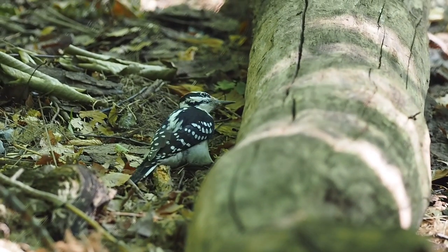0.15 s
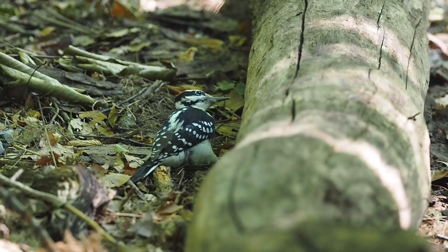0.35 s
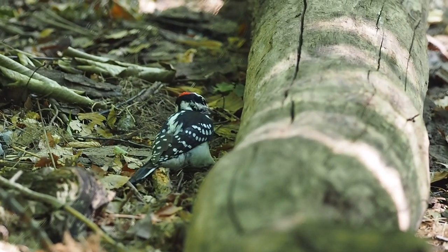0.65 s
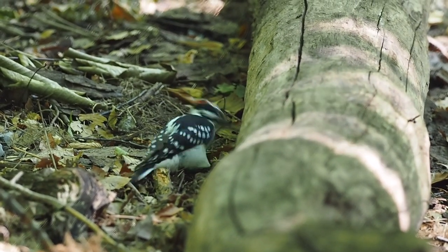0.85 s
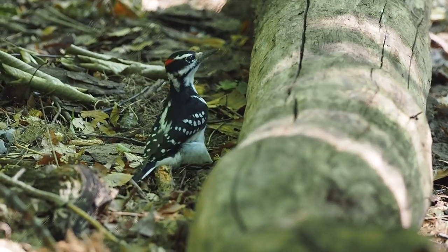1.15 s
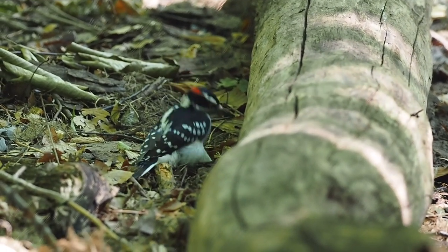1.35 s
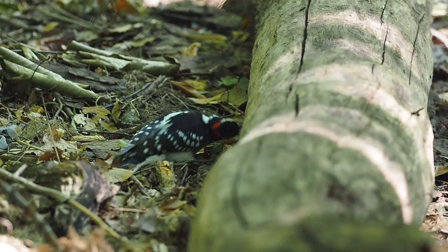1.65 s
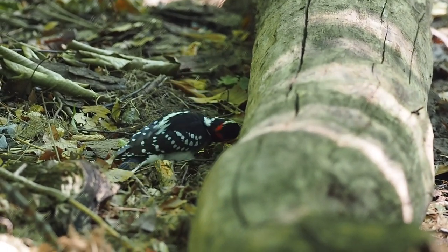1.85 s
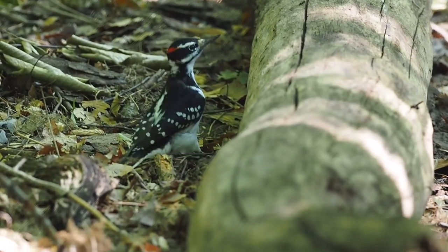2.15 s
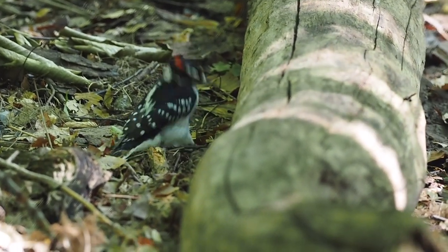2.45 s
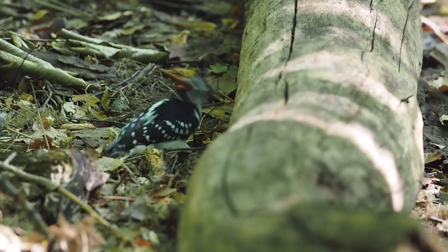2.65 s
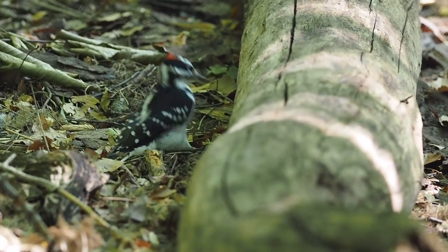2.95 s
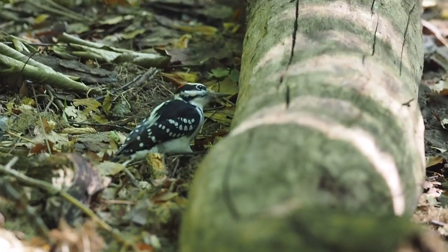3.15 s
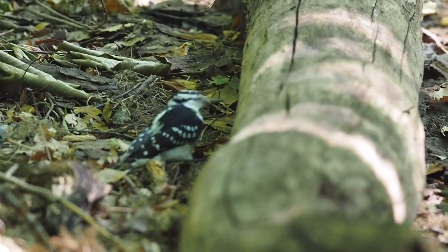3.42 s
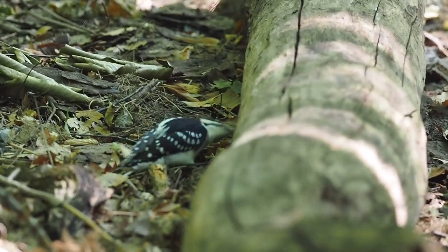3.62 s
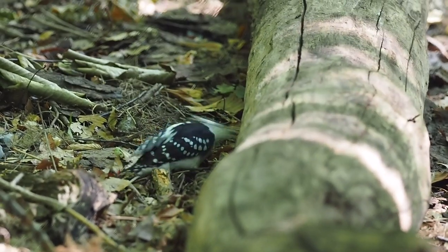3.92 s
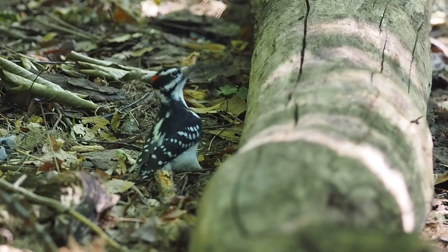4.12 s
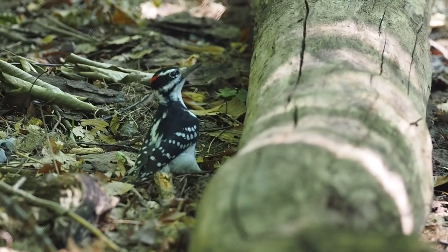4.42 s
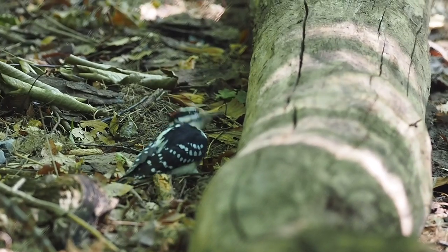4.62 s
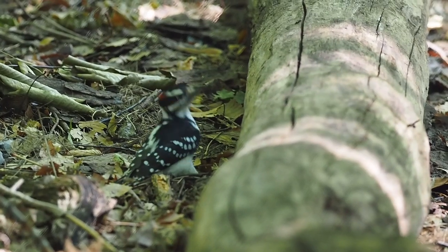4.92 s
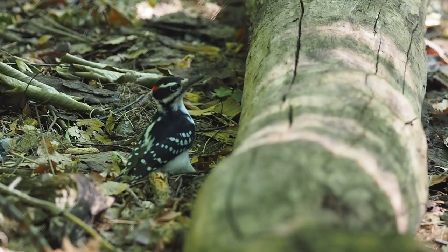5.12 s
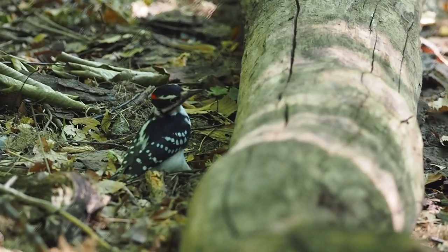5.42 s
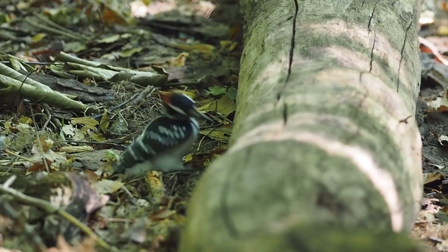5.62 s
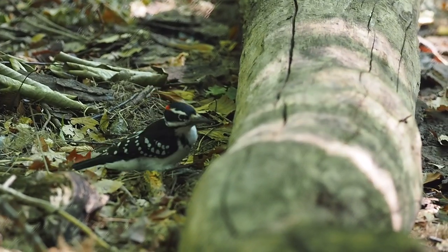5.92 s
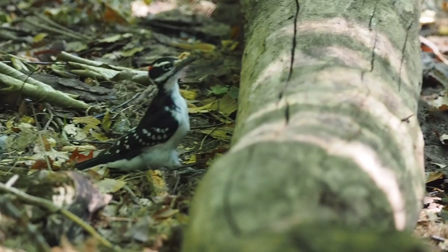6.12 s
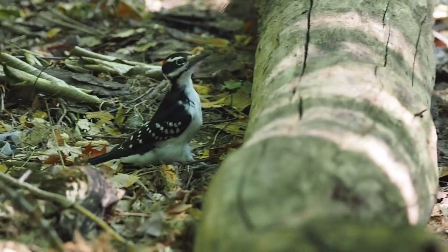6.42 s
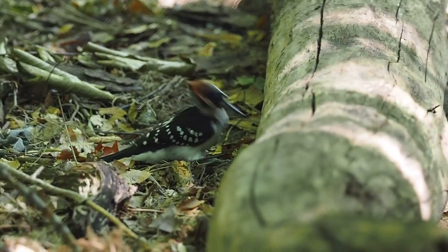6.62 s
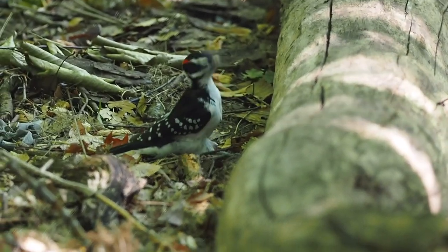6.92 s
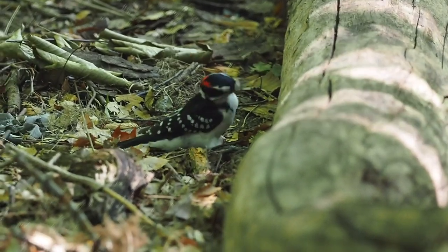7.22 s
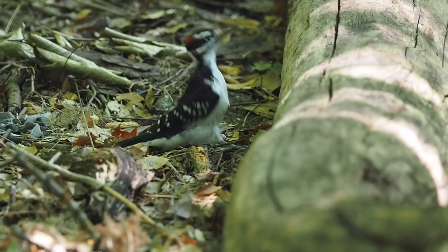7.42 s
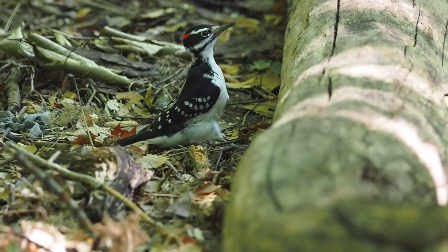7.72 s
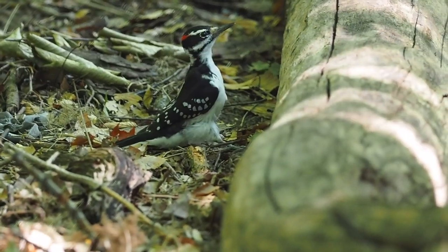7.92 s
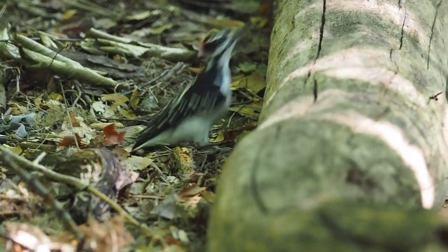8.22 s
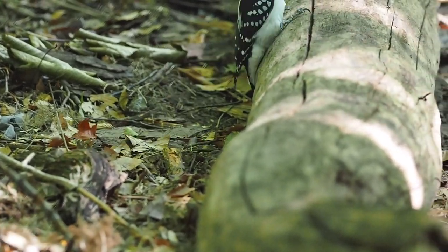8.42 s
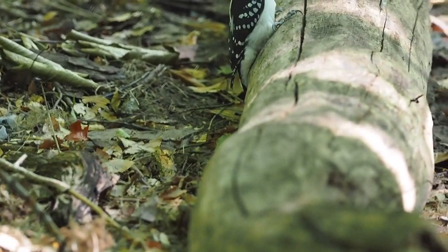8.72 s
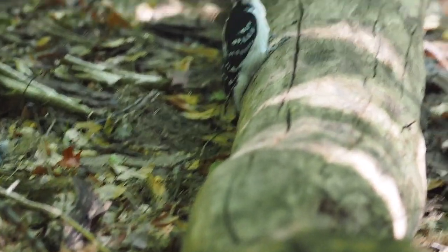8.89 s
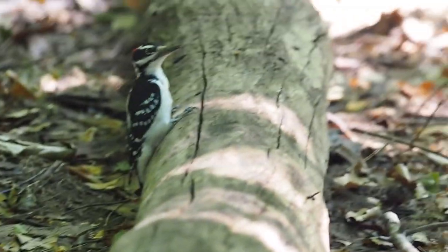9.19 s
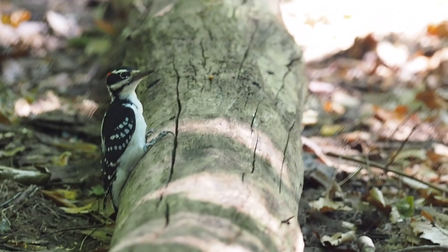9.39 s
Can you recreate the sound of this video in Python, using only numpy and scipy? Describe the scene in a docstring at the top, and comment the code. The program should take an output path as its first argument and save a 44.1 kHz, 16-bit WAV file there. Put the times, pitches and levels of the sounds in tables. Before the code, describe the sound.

A quiet summer woodland in wide stereo, with steady low traffic rumble and soft midrange tyre roar far off, plus a thin rustle of leaves. A cicada high in the canopy starts faint, swells by 0.9 s, dips and stumbles around 1.7 s with a small drop in pitch, then holds a shrill, shimmering buzz around 5 to 10 kHz, slowly rising then sagging. A faint soft whistle and tiny ticks pass near 0.9 s. At 3.5 s a distant bird calls for half a second: a sharp, clear onset turning hoarse, with a diffuse echo among trunks. A small double cluck comes at 5.1 s, a faint tone at 5.3 s. Shorter ragged calls follow at 5.9 and 6.7 s, slightly right, with faint tones between. A second cicada fades in from about 8 s, growing until the end at 9.5 s.

```python
"""Summer woodland near a road: a jay-like bird calls three times from far among the trunks, which smear its voice.
Two cicadas buzz high in the canopy over distant traffic; faint tones, a cluck and leaf ticks pass.
The traffic and leaves are shaped noise, the cicadas are stacks of overtones of a fast click rate,
the bird is a few overtones whose pitch and level turn ragged, and the cluck and ticks are short noise bursts."""
import sys
import numpy as np
from scipy import signal
from scipy.fft import rfft, irfft, next_fast_len
from scipy.io import wavfile
from scipy.ndimage import map_coordinates

SR = 44100
rng = np.random.default_rng(int(sys.argv[2]) if len(sys.argv) > 2 else 0)


def put_to_file(sound):
    """Save the sound as 16-bit audio at rate SR, in the file named by the first command-line argument."""
    columns = np.atleast_2d(sound).T  # one column per channel
    safe = np.clip(columns, -1, 1)
    whole_steps = np.round(safe * 32767)
    wavfile.write(sys.argv[1], SR, whole_steps.astype(np.int16))


N = 421155
T = np.arange(N) / SR


def amp(db):
    """Gain of a level in dB."""
    return 10 ** (np.asarray(db) / 20)


def unit(x):
    """Scale x to an rms of 1."""
    return x / np.sqrt(np.mean(x ** 2) + 1e-20)


def along(points, hz):
    """Read a curve of (Hz, value) points on a logarithmic frequency axis."""
    point_hz, value = np.transpose(points)
    return np.interp(np.log(hz + 1), np.log(point_hz + 1), value)


def curves(rows, t=T):
    """One value per sample for each column after the time."""
    row_s, *columns = np.transpose(rows)
    return [np.interp(t, row_s, column) for column in columns]


def wobble(rate, size=N):
    """A smooth random curve through `rate` random points a second."""
    points = rng.standard_normal(int(size * rate / SR) + 4)
    return map_coordinates(points, [np.arange(size) * rate / SR])


def filtered(x, response):
    """Filter x by multiplying its spectrum with a response of frequency."""
    size = next_fast_len(x.shape[-1] + 8192)  # spare room, so the end does not wrap round
    spectrum = rfft(x, size) * response(np.fft.rfftfreq(size, 1 / SR))
    return irfft(spectrum, size)[..., :x.shape[-1]]


def add(out, s, sound):
    """Mix a stereo sound in at time s."""
    part = out[:, round(s * SR):][:, :sound.shape[1]]
    part += sound[:, :part.shape[1]]


def trunks(x, t60, wet_db, shared):
    """Direct sound plus its scatter among the trunks; part of the scatter is common to both ears."""
    t = np.arange(round(1.6 * SR)) / SR
    noise = rng.standard_normal((3, len(t)))
    share = np.clip(shared, 0, 1)
    tail = np.sqrt(share) * noise[2] + np.sqrt(1 - share) * noise[:2]
    tail *= amp(-60 * t / t60) * (1 - np.exp(-t / 0.0045))  # quick build-up, then 60 dB down in t60 seconds
    tail *= amp(wet_db) / np.linalg.norm(tail[0])
    tail[:, 0] += 1  # the direct sound
    return signal.fftconvolve(x[None], tail, axes=1) / np.sqrt(1 + amp(2 * wet_db))


# How alike the noise is in the two ears: pitch_hz [Hz], likeness [1 = same, 0 = unrelated]
LIKENESS = [(25, .2), (45, .48), (80, .74), (130, .92), (290, .87), (640, .967), (1400, .97), (2400, .7),
            (4000, .4), (7000, 0), (15000, 0)]


def rush(spectrum):
    """Stereo noise of rms 1: the middle band reaches both ears almost alike, the deepest and the highest bands
    much less so."""
    def shares(hz):
        turn = np.arccos(np.clip(along(LIKENESS, hz), -1, 1)) / 2
        return amp(along(spectrum, hz)) * [np.cos(turn), np.sin(turn)]

    mid, side = filtered(rng.standard_normal((2, N)), shares)
    return unit(np.array([mid + side, mid - side]))


# How loud the traffic is before small random wobbles: time_s [s], rumble_db [dB], tyre_roar_db [dB]
ROAD_LEVELS = [(0, -38, -44), (.9, -38, -43), (2.3, -42, -43), (4.5, -39.5, -43.5), (5.3, -42.5, -43.5),
               (6.9, -41, -43), (7.3, -43, -43), (9.55, -39.5, -43.5)]
# Tone colours of engine rumble, tyre roar and leaf rustle: pitch_hz [Hz], relative_level_db [dB per Hz]
RUMBLE_COLOUR = [(8.8, -37), (15, -10), (22, -29), (40, -5), (59, 0), (123, -3), (152, -7.5), (182, -11.5),
                 (330, -26), (430, -44), (730, -120)]
ROAR_COLOUR = [(120, -18), (200, -2), (291, -10), (371, -4.5), (523, -6), (652, -4), (778, -4), (822, -5.5),
               (898, 0.5), (1110, -5), (1210, -7.5), (1370, -8.5), (2200, -21), (2800, -22.5),
               (3640, -23.5), (6160, -120)]
LEAF_COLOUR = [(1500, -18), (2400, -5.5), (3200, -5), (4300, -3.5), (6000, -1), (9000, -7), (11000, -8.5),
               (13000, -10), (15700, -15)]


def background():
    """Engine rumble, tyre roar and leaf rustle, each a coloured noise whose level drifts."""
    rumble_db, roar_db = curves(ROAD_LEVELS)
    rumble = amp(rumble_db + 0.46 * wobble(4)) * rush(RUMBLE_COLOUR)
    roar = amp(roar_db + .3 * wobble(4)) * rush(ROAR_COLOUR)
    rustle_db = -54.5 + 0.21 * wobble(3.8) + 0.79 * wobble(11)
    rustle = amp(rustle_db) * rush([(300, -120)] + LEAF_COLOUR)
    return (rumble + roar + rustle) * amp([[.3], [-.3]])  # a touch louder on the left


# Ringing of the tymbal, the cicada's clicking drum skin: pitch_hz [Hz], relative_level_db [dB]
TYMBAL_RING = [(4400, -20), (5000, -18), (5250, -9), (5480, -1), (5700, -6.5), (6300, -6), (6800, -3),
               (7300, -1), (7900, 3), (8300, -5.5), (9200, -5), (9600, -9), (10100, -18.5), (11500, -24)]


def buzz(rate, jitter, even_db):
    """A steady click train as its overtones, coloured by the ringing tymbal; jitter blurs the lines."""
    phase = 2 * np.pi * (np.cumsum(rate) / SR + jitter * wobble(170))
    even = amp(even_db)
    tone = [0, 0]  # even overtones, odd overtones
    for k in range(26, 66):
        tone[k % 2] = tone[k % 2] + amp(along(TYMBAL_RING, k * rate.mean())) * np.cos(k * phase)
    return unit((even * tone[0] + tone[1]) / np.sqrt(1 + even ** 2))


# Near cicada's muscle, two phrases that speed up as it warms and sag as it tires:
# time_s [s], click_rate_hz [clicks per s]
NEAR_CLICKS = [(0, 170.9), (.95, 172.05), (1.45, 172.42), (1.7, 172.4), (1.74, 168.4), (1.95, 169.2),
               (2.4, 169.75), (3.4, 170.42), (6.4, 171.95), (7.2, 172.12), (7.7, 172.08), (8.15, 171.78),
               (8.45, 171.22), (9.1, 169.4), (9.25, 169.8)]
# Near cicada's effort: time_s [s], level_db [dB]
NEAR_EFFORT = [(0, -57.5), (.42, -55), (.9, -49.5), (1.5, -49.5), (1.7, -55), (1.8, -49.5), (2.34, -47.5),
               (3.6, -48.5), (5.8, -48), (6.1, -46.5), (6.8, -46.5), (7.9, -48), (9.55, -50.5)]
# Even overtones of the near buzz against the odd ones: time_s [s], even_db [dB]
NEAR_EVEN = [(0, -6), (1.15, -7), (1.5, 0), (2.2, -3), (5, 3), (6.6, 3), (9.55, -3)]
# Second cicada's muscle: time_s [s], click_rate_hz [clicks per s]
FAR_CLICKS = [(0, 172.6), (7.8, 172.9), (9, 173.27), (9.55, 173.4)]
# Second cicada's effort: time_s [s], level_db [dB]
FAR_LEVELS = [(7.4, -85), (8.2, -60), (9, -56.5), (9.55, -50)]
# How the buzz differs between the ears: pitch_hz [Hz], left_over_right_db [dB]
EAR_LEVEL = [(5800, -1), (6400, 1), (7200, 10), (7700, 0), (8600, 3), (10500, -3)]
# and how far the left ear lags the right: pitch_hz [Hz], lag_rad [radians]
EAR_LAG = [(5500, 0), (6500, 1), (7400, 2), (7800, 3), (8800, 3), (9500, 5.5), (10500, 8)]
STEADY_JITTER, BREAK_JITTER = .0008, .009  # timing scatter in click cycles: mid-phrase, at the change of phrase
BREAK_S, FALTER_S, RECOVER_S = 1.8, .6, .15  # change of phrase, stumble before it, recovery after it


def cicadas():
    """As the click rate drifts, each overtone slides through the scatter and swells or fades alone."""
    jitter = np.interp(T - BREAK_S, [-FALTER_S, 0, RECOVER_S],
                       [STEADY_JITTER, BREAK_JITTER, STEADY_JITTER])
    near_rate = curves(NEAR_CLICKS)[0] + 0.031 * wobble(5)
    near = amp(curves(NEAR_EFFORT)[0]) * buzz(near_rate, jitter, curves(NEAR_EVEN)[0])
    far = amp(curves(FAR_LEVELS)[0]) * buzz(curves(FAR_CLICKS)[0], .001, 0)
    heard = trunks(near, t60=1.1, wet_db=4.5, shared=.2)
    heard = heard + trunks(far, t60=.6, wet_db=8, shared=.25)
    ear = np.array([[.5], [-.5]])  # each ear takes half of the difference

    def between_ears(hz):
        return amp(ear * along(EAR_LEVEL, hz)) * np.exp(-1j * ear * along(EAR_LAG, hz))

    return filtered(heard[:, :N], between_ears)


# Faint far tones: start_s [s], length_s [s], start_pitch_hz [Hz], end_pitch_hz [Hz], peak_level_db [dB]
FAR_TONES = [(.84, .32, 1285, 1262, -46), (5.33, .09, 1150, 1150, -46), (6.59, .12, 1235, 1195, -46),
             (6.37, .04, 2740, 2750, -52), (6.28, .25, 360, 360, -51)]


def whistles():
    """Soft single tones from far away: gliding sines that swell and fade."""
    out = np.zeros((2, N))
    for s, length, start_hz, end_hz, db in FAR_TONES:
        u = np.linspace(0, 1, round(length * SR))
        hz = start_hz + (end_hz - start_hz) * u
        tone = np.sin(2 * np.pi * np.cumsum(hz) / SR) * np.sin(np.pi * u) ** .5
        add(out, s, trunks(amp(db) * tone, t60=0.9, wet_db=-12, shared=0.94))
    return out


# Short noisy events: start_s [s], fade_s [s], centre_pitch_hz [Hz], half_width_hz [Hz],
# level_db [dB, before the rise and fade]
SHORT_SOUNDS = [(5.082, .038, 2200, 400, -49), (5.078, .035, 2850, 450, -47), (5.215, .022, 2500, 600, -53),
                (.915, .025, 3000, 400, -54), (.892, .01, 12500, 4000, -62), (.912, .02, 12500, 4000, -60),
                (5.776, .008, 14000, 2200, -64)]


def snaps():
    """A low cluck with its echo, and dry ticks in the leaf litter: bursts of noise around one pitch."""
    out, t = np.zeros((2, N)), np.arange(SR // 10) / SR
    for s, length, hz, width_hz, db in SHORT_SOUNDS:
        band = filtered(rng.standard_normal(len(t)), lambda f: np.exp(-((f - hz) / width_hz) ** 4))
        burst = amp(db) * unit(band) * np.clip(t / 0.0037, 0, 1) * np.exp(-(t / length) ** 4)
        add(out, s, trunks(burst, t60=.9, wet_db=-1, shared=.5))
    return out


# Bird's voice: overtone [multiple of the base pitch], relative_level_db [dB]
THROAT_OVERTONES = [(2, -18), (3, -12), (4, 0), (5, -14), (6, -9), (7, -10), (8, -9), (9, -22)]
# Bird calls: start_s [s], length_s [s], then base pitches top_hz, settled_hz, last_hz [Hz], level_db [dB],
# hoarse_after_s [s], breaks_after_s [s], second_push_s [s], push_level_db [dB]
CALLS = [(3.497, .515, 801, 773, 780.4, -36.5, .1, .08, 0.2, -41.5),
         (5.894, 0.43, 830, 758, 751, -36.5, .05, .18, .14, -41.5),
         (6.735, .39, 811.5, 795, 748, -37, .12, 0.17, 0.22, -45.5)]
ATTACK_S, RELEASE_S, PUSH_S = 0.0259, .03, 0.022  # rise, cut-off, rise of the second push
SCOOP, SETTLE_S = 0.0598, .03  # pitch share under the top at the start; time to drop from the top
FADE_DB_PER_S, TAIL_DB_PER_S, SUSTAIN_DB = 80, 120, -19  # after attack; after push; floor against the first peak
ODD_DB, ODD_DB_PER_S = 2.5, 190  # odd overtones once the voice has broken, and how fast they come
CLEAR_S, CLEAR_ODD_DB = .14, -10  # the voice clears over this time before the end; change of odd overtones
PURE_DB, HOARSE_DB = -1.5, .4  # brightness, dB per overtone above the fourth: clear voice, hoarse voice
WAVER, FLUTTER_DB = .036, 4.5  # pitch share and level by which a hoarse voice shakes


def ramp(x):
    """Keep x between 0 and 1."""
    return np.clip(x, 0, 1)


def jay():
    """Each call starts pure; then its period doubles, odd overtones appear, pitch and level turn ragged."""
    out = np.zeros((2, N))
    for s, length, top_hz, settled_hz, last_hz, db, roughens, breaks, push, push_db in CALLS:
        t = np.arange(0, length, 1 / SR)
        after = np.maximum(t - ATTACK_S, 0)
        rise = ramp(t / ATTACK_S)

        # Breath: a first push, a second push and a quiet floor
        first = amp(db - FADE_DB_PER_S * after) * ramp((push - t) / PUSH_S)
        second = amp(push_db - TAIL_DB_PER_S * np.maximum(t - push, 0))
        second = second * ramp(1 + (t - push) / PUSH_S) ** 2
        effort = (first + second + amp(db + SUSTAIN_DB)) * rise ** 2 * ramp((length - t) / RELEASE_S)

        # Hoarseness grows after the attack and clears towards the end
        clearing = 1 - ramp((length - t) / CLEAR_S)
        hoarse = ramp(after / roughens) * (1 - clearing)
        odd_db = ODD_DB + ODD_DB_PER_S * np.minimum(t - breaks, 0) + CLEAR_ODD_DB * clearing
        bright_db = PURE_DB + (HOARSE_DB - PURE_DB) * hoarse

        # Pitch scoops up to the top, then drops to a slow glide
        base_hz = settled_hz + (last_hz - settled_hz) * t / length
        glide = base_hz + (top_hz - base_hz) * np.exp(-after / SETTLE_S) - SCOOP * top_hz * (1 - rise)
        hz = glide * (1 + WAVER * hoarse * np.tanh(wobble(320, size=len(t))))
        phase = 2 * np.pi * np.cumsum(hz) / SR  # the shaking spreads higher overtones more

        voice = 0
        for k, level in THROAT_OVERTONES:
            k = round(k)
            overtone_db = level + odd_db * (k % 2) + bright_db * max(k - 4, 0)
            voice = voice + amp(overtone_db) * np.sin(k * phase)
        flutter_db = FLUTTER_DB * hoarse * np.minimum(wobble(160.3, size=len(t)), 1)
        voice *= effort * amp(flutter_db)
        heard = trunks(voice, t60=1.0, wet_db=1.5, shared=0.46)
        add(out, s, heard * amp([[-.8], [.8]]))  # a little to the right
    return out


def scene():
    """All sources together."""
    return background() + cicadas() + whistles() + snaps() + jay()


TOP_HZ, OFFSET = 15720, -.002  # upper band limit in Hz; constant shift of the waveform


def record(dry):
    """Remove everything from the band limit up and shift the waveform by a small constant."""
    return filtered(dry, lambda hz: hz < TOP_HZ) + OFFSET


dry = scene()
out = record(dry)
put_to_file(out)
```